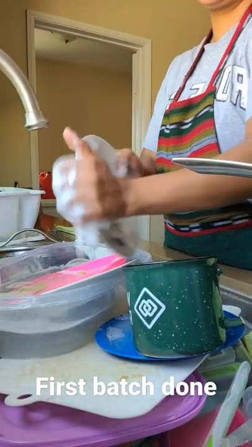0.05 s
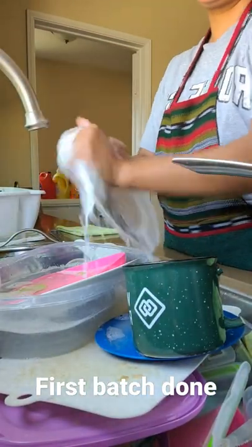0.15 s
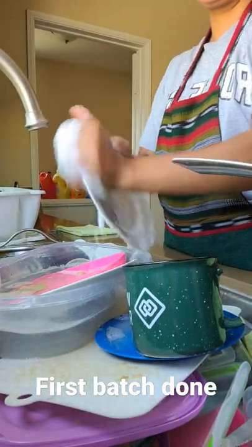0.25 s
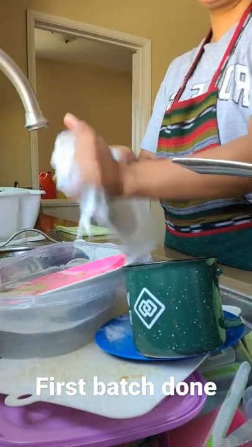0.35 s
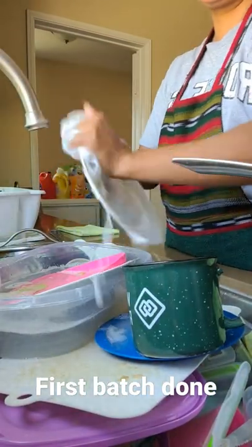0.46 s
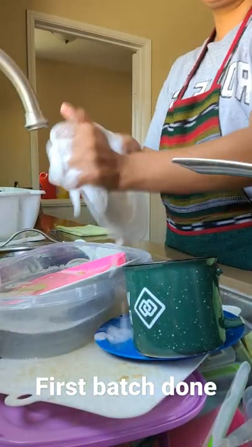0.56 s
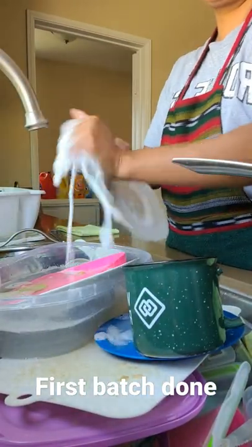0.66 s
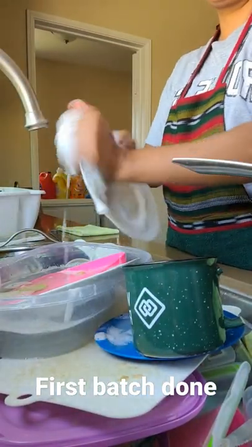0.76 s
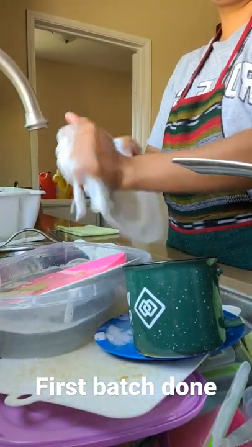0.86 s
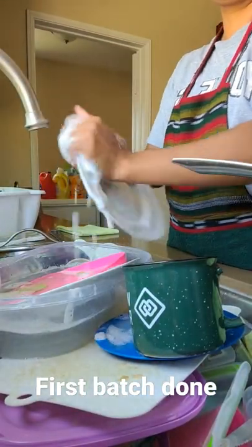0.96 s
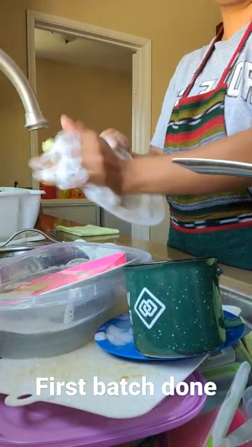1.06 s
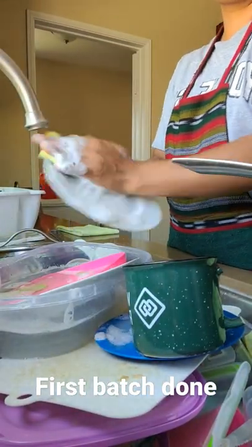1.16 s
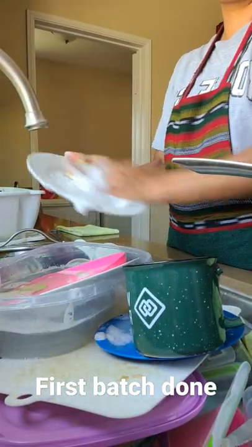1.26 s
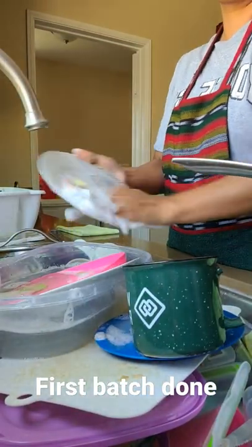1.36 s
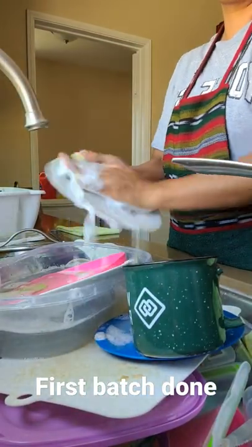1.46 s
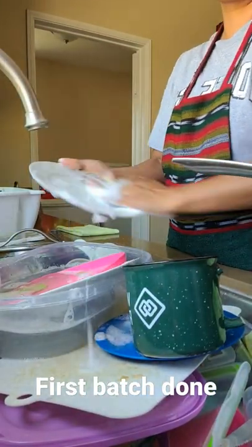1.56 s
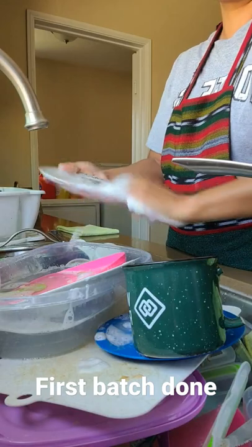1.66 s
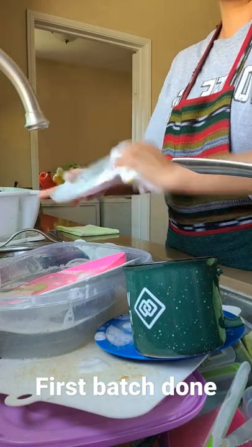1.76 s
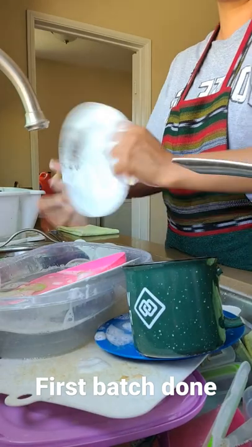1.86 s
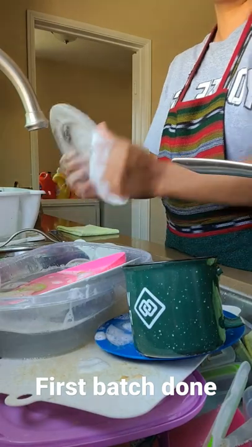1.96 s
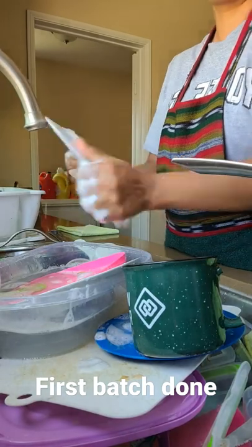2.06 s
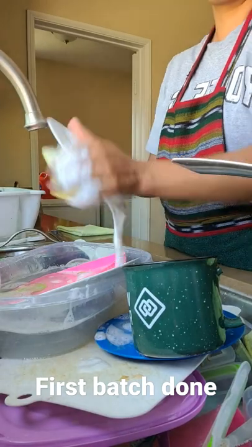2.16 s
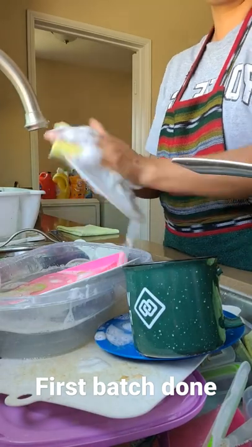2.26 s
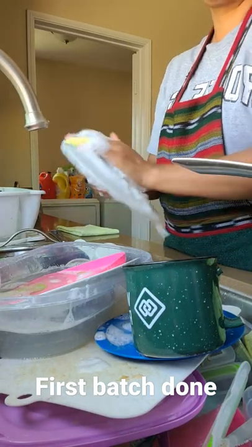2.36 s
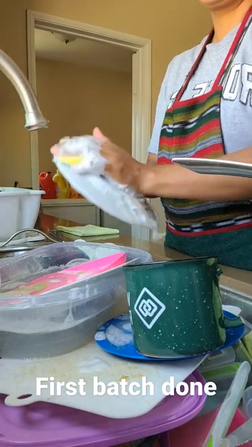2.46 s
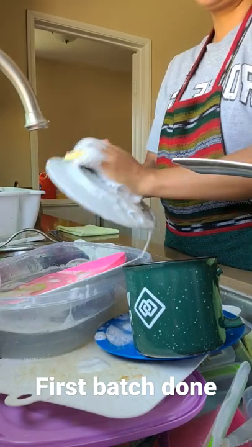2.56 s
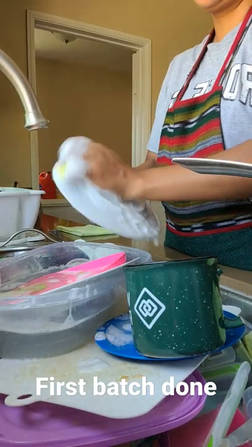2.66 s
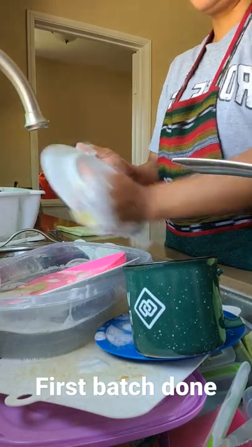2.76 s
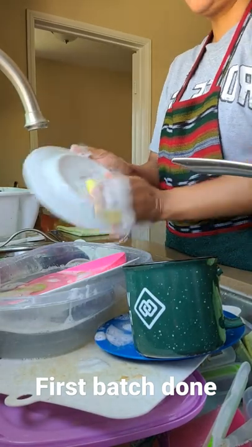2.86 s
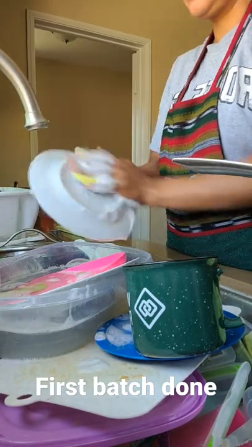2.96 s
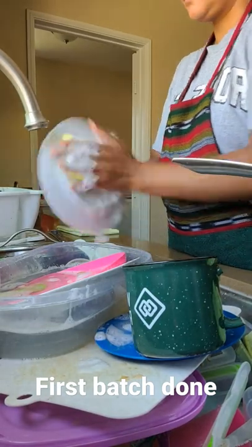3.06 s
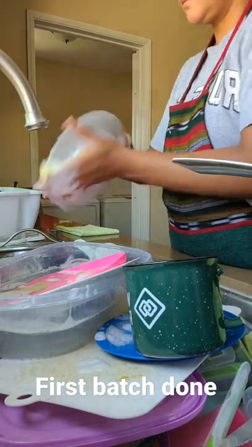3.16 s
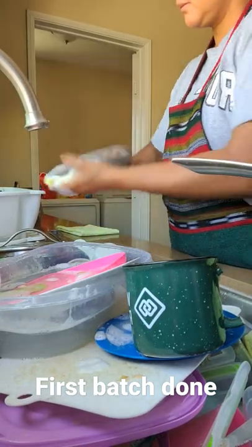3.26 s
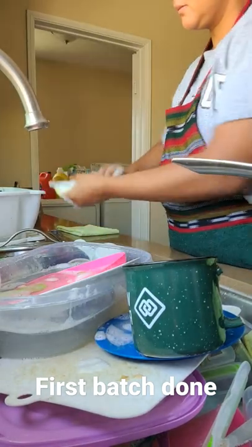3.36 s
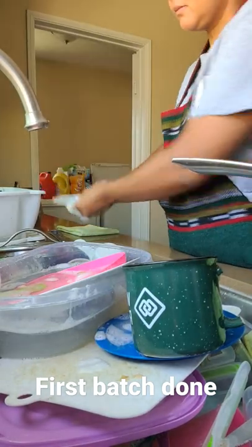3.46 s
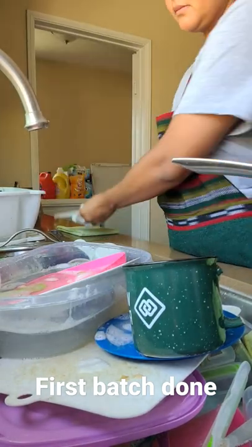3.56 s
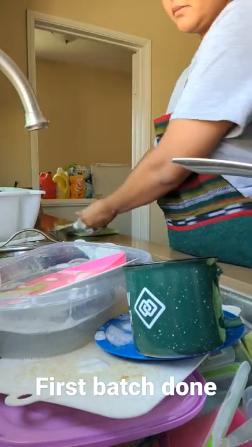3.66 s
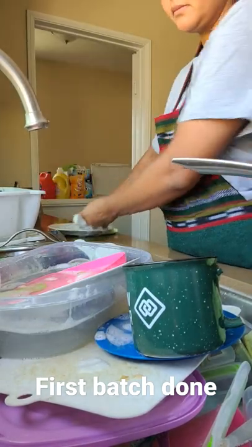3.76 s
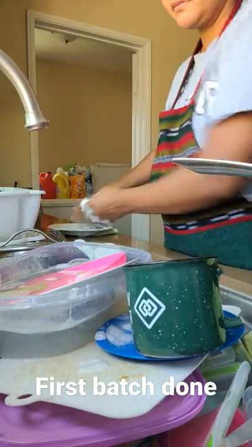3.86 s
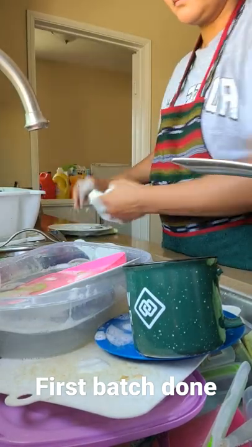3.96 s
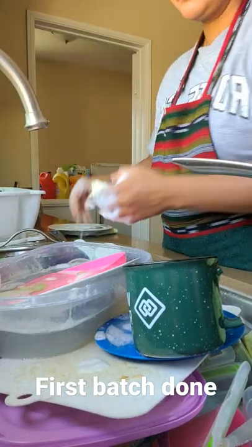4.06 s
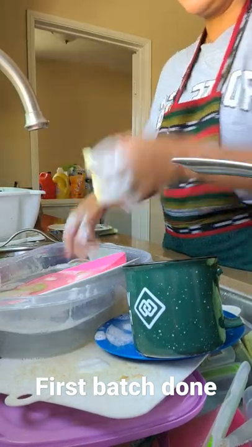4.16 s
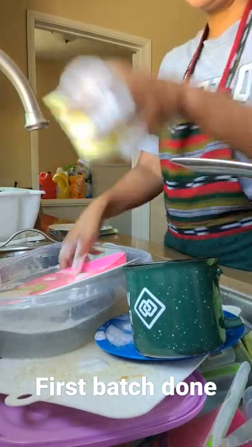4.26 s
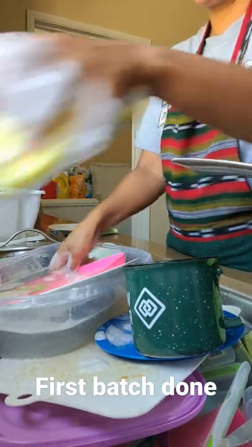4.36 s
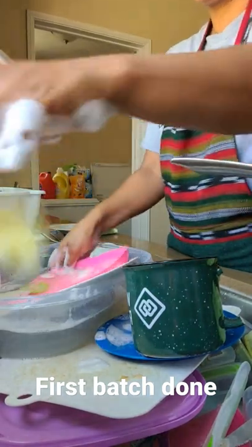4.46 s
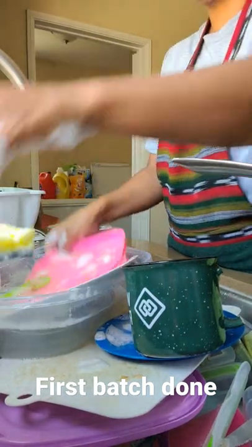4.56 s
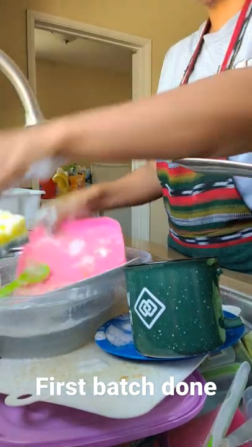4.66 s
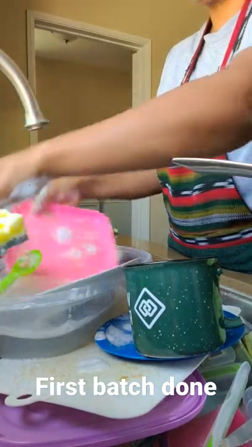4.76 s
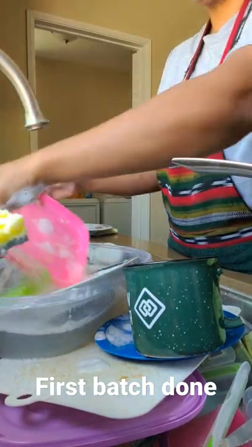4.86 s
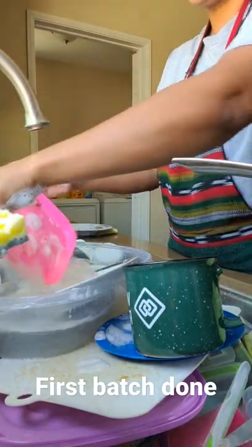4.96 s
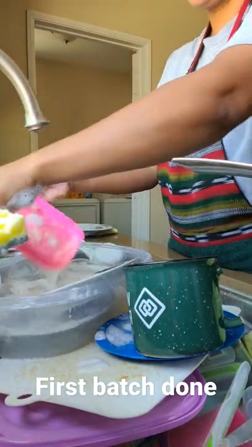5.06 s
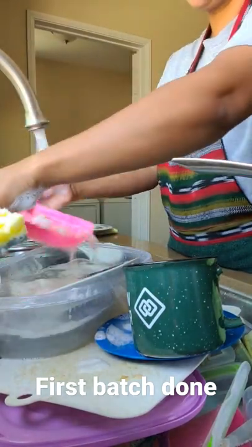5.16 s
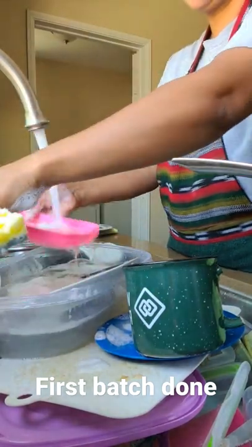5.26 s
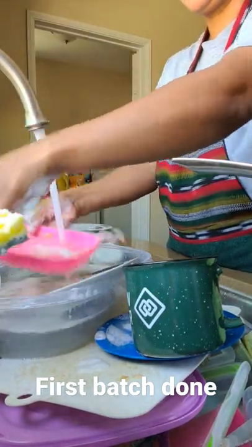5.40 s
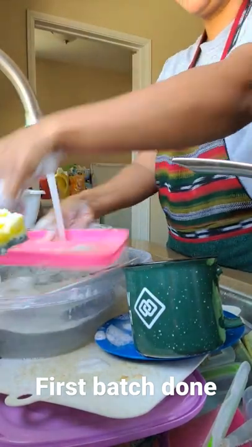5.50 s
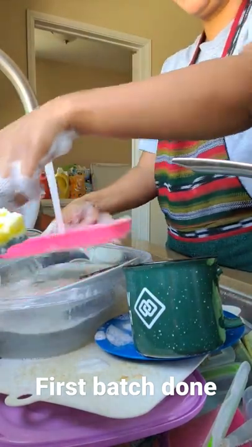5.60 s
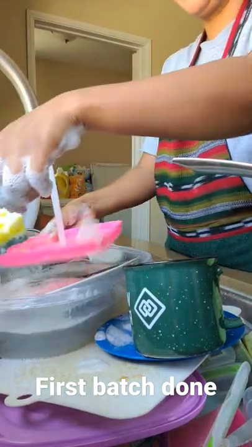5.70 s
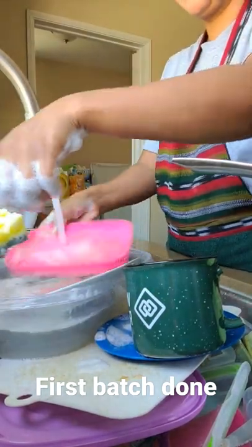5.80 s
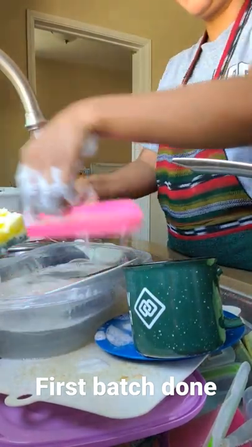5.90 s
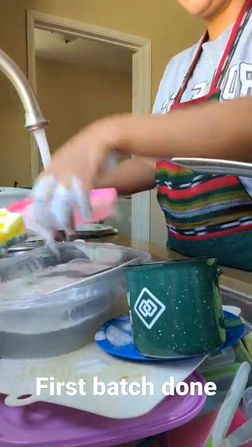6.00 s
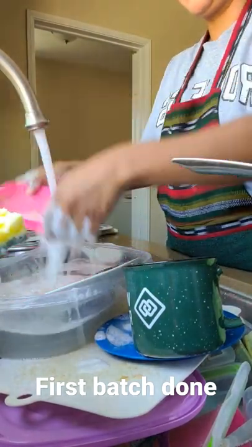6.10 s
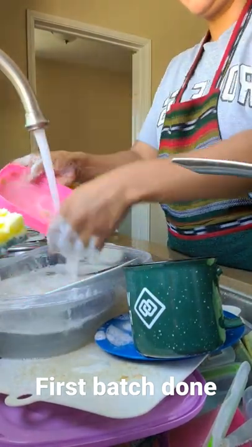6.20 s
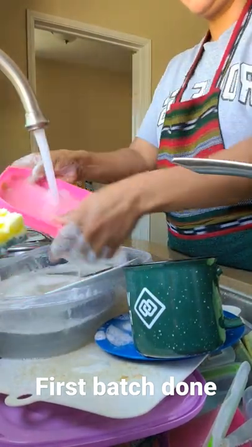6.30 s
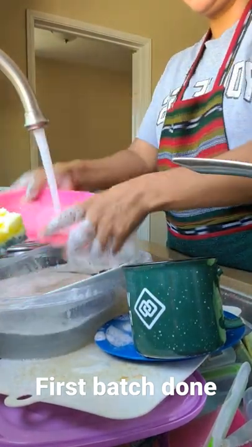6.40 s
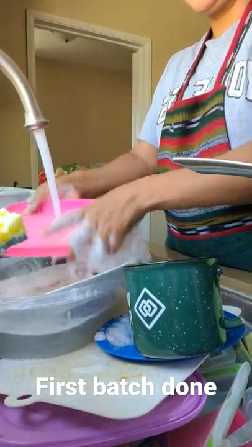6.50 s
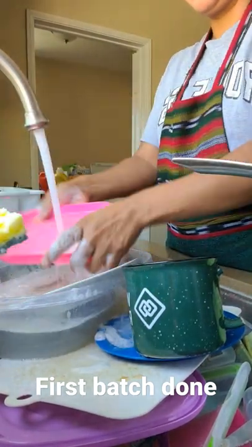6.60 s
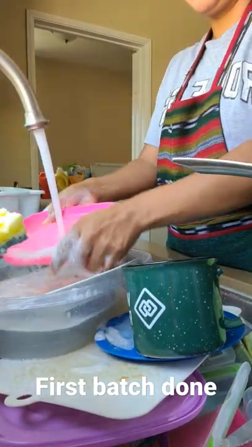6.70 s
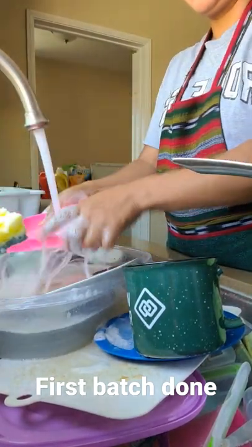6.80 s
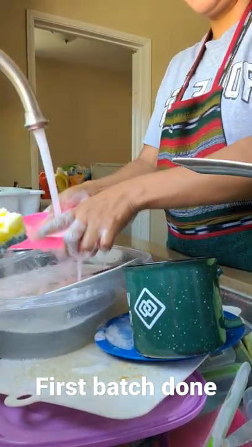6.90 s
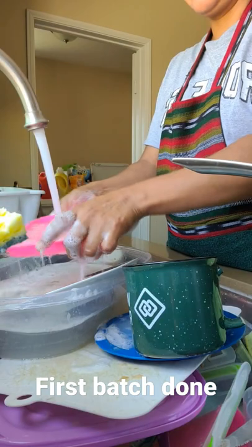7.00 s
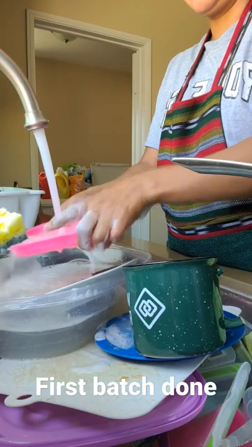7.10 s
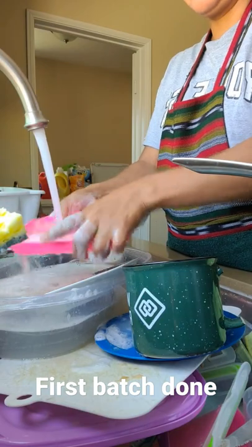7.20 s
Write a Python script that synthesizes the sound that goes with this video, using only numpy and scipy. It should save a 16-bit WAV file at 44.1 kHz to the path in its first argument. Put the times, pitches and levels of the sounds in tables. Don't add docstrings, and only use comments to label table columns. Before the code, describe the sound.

Soapy dishwashing at a kitchen sink: sponge strokes, a wet squeak, clattering dishes, hollow plastic gulps, then a tap hissing onto plastic.

```python
import sys
import numpy as np
from scipy import signal
from scipy.fft import rfft, irfft, next_fast_len
from scipy.io import wavfile
from scipy.ndimage import uniform_filter1d

SR = 44100
rng = np.random.default_rng(int(sys.argv[2]) if len(sys.argv) > 2 else 0)


def undo_db(level):
    steps = np.asarray(level, float) / 20
    return 10 ** steps


def master_out(mix):
    frames = np.transpose(np.atleast_2d(mix))
    ceiling = np.clip(frames, -1, 1)
    pcm = np.round(ceiling * 32767).astype(np.int16)
    wavfile.write(sys.argv[1], SR, pcm)


N = 319284

# frequency in Hz, level in dB per Hz.
RUB_COLOUR = [(380, -30), (650, -6), (813, -12), (1010, 0), (1170, 0), (1400, 5.5), (1520, -1), (2040, 6),
              (2510, -0.5), (2860, 0), (3550, -2.5), (3780, -2), (4400, -19), (5720, -37), (9680, -120)]
# frequency in Hz, level in dB per Hz.
FIZZ_COLOUR = [(2350, -20), (4000, -3), (4390, -5.5), (5830, -1.5), (8650, -12), (9940, -4.5),
               (11200, -10.5), (12200, -10), (13600, -24), (15100, -9.5), (16000, -30)]
RIGHT_LAG_S = 0.0005936
LAG_FROM_HZ = 496


def rms_one(x):
    return x / np.sqrt(np.mean(x ** 2) + 1e-20)


def swell(peak_s, rise_s, fall_s):
    t = np.arange(N) / SR - peak_s
    return np.exp(-(t / np.where(t < 0, rise_s, fall_s)) ** 2)


def ramp(s, length):
    return np.clip((np.arange(N) / SR - s) / length, 0, 1)


def drift(rate):
    knots_per_s = 60
    knots = rng.standard_normal(int(N / SR * knots_per_s) + 2)
    memory = np.exp(-2 * np.pi * rate / knots_per_s)
    slow = rms_one(signal.lfilter([1], [1, -memory], knots))
    return np.interp(np.arange(N) / SR * knots_per_s, np.arange(len(slow)), slow)


def add(out, s, sound):
    i = round(s * SR)
    out[..., i:i + sound.shape[-1]] += sound[..., :N - i]


def at_hz(points, hz):
    points = np.array(points)
    return np.interp(np.log(hz + 1), np.log(points[:, 0]), points[:, 1])


def colour(x, spectrum):
    hz = np.fft.rfftfreq(x.shape[-1], 1 / SR)
    inside = (hz > spectrum[0][0]) & (hz < spectrum[-1][0])
    return irfft(rfft(x) * undo_db(at_hz(spectrum, hz)) * inside, x.shape[-1])


def resonance(x, hz, width_hz):
    r = np.exp(-np.pi * width_hz / SR)
    return signal.lfilter([(1 - r * r) / 2, 0, (r * r - 1) / 2],
                          [1, -2 * r * np.cos(2 * np.pi * hz / SR), r * r], x)


def ports(mid, side):
    # frequency in Hz, likeness from 0 to 1.
    likeness = [(60, 1), (150, 1), (380, 0.99), (950, 0.11), (2380, 0.11), (5980, 0.095), (15000, 0.059)]
    # frequency in Hz, left over right in dB.
    left_lead = [(40, -4.5), (130, -6), (300, -5.5), (700, -5.5), (2000, -4), (4000, -7), (7000, 0),
                 (10500, -10.5), (13000, 3.5), (15500, -3)]
    hz = np.fft.rfftfreq(len(mid), 1 / SR)
    alike = np.clip(at_hz(likeness, hz), -1, 1)
    lead = undo_db(at_hz(left_lead, hz) / 2)
    common = np.sqrt(1 + alike) * rfft(mid)
    apart = np.sqrt(1 - alike) * rfft(side)
    lag = np.exp(-2j * np.pi * hz * RIGHT_LAG_S / (1 + (LAG_FROM_HZ / (hz + 1)) ** 4))
    return irfft(np.array([(common + apart) * lead, (common - apart) / lead * lag]), len(mid))


def grainy(spectrum, per_s, spread_db, grain_db, flicker_db):
    size = next_fast_len(N)
    sizes = undo_db(spread_db * np.minimum(rng.exponential(1, (2, size)), 4))
    sizes = sizes * rng.choice([-1, 1], (2, size))
    drops = rms_one(sizes * (rng.random((2, size)) < per_s / SR))
    noise = rng.standard_normal((2, size)) + undo_db(grain_db) * drops
    both = ports(*colour(noise, spectrum))[:, :N]
    return undo_db(flicker_db * drift(22)) * both / np.std(both.mean(axis=0))


def kitchen():
    # frequency in Hz, time to fall 60 dB in seconds.
    echo_times = [(100, 0.33), (400, 0.16), (2000, 0.25), (8000, 0.23), (15000, 0.27)]
    t = np.arange(SR // 2) / SR
    white = ports(*rng.standard_normal((2, len(t))))
    tail = 0
    for low in 40 * 2. ** np.arange(9):
        octave = signal.butter(2, [low, 2 * low], "band", fs=SR, output="sos")
        band = signal.sosfilt(octave, white)
        tail = tail + band * undo_db(-60 * t / at_hz(echo_times, np.sqrt(2) * low))
    tail = tail * np.minimum(t / 0.0033, 1)
    return tail / np.sqrt(np.sum(tail ** 2) / 2)


def recorder_gain_db():
    # time in seconds, gain in dB.
    gain_curve = [(0.0, 3.5), (0.26, 3), (0.91, -1), (1.95, 4.5), (2.2, -1), (3.1, -2.5), (3.7, 1.5),
                  (3.95, -0.5), (4.56, 0.5), (5.22, 5), (7.24, 2)]
    s, db = np.transpose(gain_curve)
    return np.interp(np.arange(N) / SR, s, db)


def fridge():
    # frequency in Hz, level in dB per Hz.
    rumble_colour = [(12, -37), (20, 3), (65, 0), (91, -0.5), (95, -3), (105, -37), (140, -67), (230, -120)]
    # frequency in Hz, level in dB per Hz.
    drone_colour = [(79, -44), (135, -5), (151, -12), (187, -7), (209, -15), (318, -10.5), (361, -0.5),
                    (383, -7), (472, -11.5), (512, -18.5), (560, -13.5), (635, -20.5), (800, -23),
                    (1040, -22), (1760, -120)]
    # frequency in Hz, level in dB.
    hum_tones = [(30.5, -34), (60, -47), (120, -3), (240, -43), (360, -12), (600, -23)]
    gain_db = recorder_gain_db()
    t = np.arange(N) / SR
    hum = 0
    for hz, db in hum_tones:
        hum = hum + undo_db(db + 0.71 * drift(13)) * np.sin(2 * np.pi * hz * t + 0.5 * drift(1))
    hum = undo_db(-41 + gain_db) * hum * undo_db(np.array([[1.2], [-1.2]]))
    rumble = undo_db(-50.5 + 0.77 * gain_db) * grainy(rumble_colour, 300, 1.47, -34, 0.48)
    basin_boom_db = 4 * ramp(4.34, 0.99)
    drone = undo_db(-47 + gain_db + basin_boom_db) * grainy(drone_colour, 260, 5.4, -1.5, 0.4)
    return hum + rumble + drone


def scrubbing():
    # time of the peak in seconds, level in dB, length in seconds, fizz against rub in dB.
    sponge_strokes = [(0.027, -53, 0.029, -31), (0.243, -58, 0.13, -4.5), (0.472, -66, 0.032, -3),
                      (0.743, -69, 0.03, 3.5), (0.97, -60.5, 0.022, 0), (1.067, -58, 0.081, 3),
                      (1.43, -66, 0.079, 1), (1.693, -60.5, 0.15, -2), (1.855, -48, 0.036, -1.5),
                      (2.227, -54, 0.053, -2), (2.648, -61, 0.049, -2), (2.823, -54.5, 0.051, -0.5),
                      (2.947, -55.5, 0.044, -11), (3.045, -54.5, 0.072, 0), (3.318, -56.5, 0.028, 3),
                      (3.644, -46, 0.0037, -19), (3.814, -63, 0.037, -1), (4.132, -71, 0.067, -1),
                      (4.4, -59, 0.052, -4), (4.668, -62, 0.034, -37), (4.856, -54.5, 0.023, -10),
                      (4.985, -49, 0.044, -1), (5.13, -49.5, 0.033, -3)]
    gain_db = recorder_gain_db()
    rub, fizz = undo_db(-60 + gain_db), undo_db(-65.5 + gain_db)
    for s, db, length, fizz_db in sponge_strokes:
        stroke = undo_db(db) * swell(s, length, 1.94 * length)
        rub = rub + stroke
        fizz = fizz + undo_db(fizz_db) * stroke
    return rub * grainy(RUB_COLOUR, 400, 4.0, -6, .7) + fizz * grainy(FIZZ_COLOUR, 900, 4.0, -6, .7)


def rough_strand(hz):
    tremble = rms_one(signal.lfilter([1], [1, -.992], rng.standard_normal(N)))
    return (.9 + .4 * tremble) * undo_db(2.5 * drift(24)) * np.sin(2 * np.pi * np.cumsum(hz) / SR)


def squeak():
    press = swell(.175, .06, .11)
    lower_hz = 1160 - 110 * (1 - press) + 25 * drift(24)
    upper_hz = 1610 + 25 * drift(24)
    strands = rough_strand(lower_hz) + press * rough_strand(upper_hz)
    return undo_db(-50) * np.sqrt(press) * strands * undo_db(np.array([[3], [-3]]))


def tap():
    # frequency in Hz, level in dB per Hz.
    spray_colour = [(2350, -70), (4000, -6.5), (4120, -25), (4850, -10.5), (5620, -6), (8970, -9),
                    (9620, -5), (10600, -3), (13400, -10.5), (14900, -4), (15500, 8.5), (15900, 2),
                    (16200, -39)]
    # frequency in Hz, level in dB per Hz.
    splash_colour = [(380, -55), (650, -6), (693, 0), (745, -14), (902, -15), (1010, -7.5), (1160, -7.5),
                     (1540, -0.5), (1780, -2), (2020, 1), (2590, -3), (3270, 2), (3780, 0), (4130, -11),
                     (4400, 2.5), (5720, -66), (9680, -120)]
    opens_s, opening_s = 5.118, .036
    surge_db = 2 * swell(5.46, 0.34, 0.34)
    tilt_db = 1.3 * ramp(6.4, 0.72)
    flow = ramp(opens_s, opening_s) * undo_db(surge_db + tilt_db)
    spray = undo_db(-29) * grainy(spray_colour, 2700, 12.0, -11.0, 0.44)
    splash = undo_db(-40) * grainy(splash_colour, 1200, 7, -12, 0.7)
    return flow * (spray + ramp(opens_s, 2.2 * opening_s) * splash)


def gulps():
    # start in seconds, peak in dB, frequency in Hz, time to fall 60 dB in seconds.
    hollow_bumps = [(4.104, -23.5, 380, 0.052), (4.458, -21.5, 430, 0.072), (4.462, -29, 804, 0.1),
                    (4.837, -29.5, 304, .05), (4.888, -20, 380, 0.082), (4.901, -23, 483, 0.058),
                    (4.918, -28, 424, 0.08), (4.889, -33, 913, 0.059), (4.995, -15.5, 303, 0.029),
                    (5.4, -37, 380, 0.076), (6.549, -24.5, 359, 0.13), (6.906, -21, 658, 0.044)]
    out = np.zeros((2, N))
    t = np.arange(SR // 5) / SR
    for s, peak_db, hz, t60 in hollow_bumps:
        tone = np.sin(2 * np.pi * hz * t * (1 + 2.0 * t))
        add(out, s, undo_db(peak_db - 6.0) * tone * undo_db(-60 * t / t60) * np.minimum(t / 0.0038, 1))
    return out


def touches():
    # start in seconds, peak in dB, resonance in Hz, its level in dB, bright part in dB.
    short_ticks = [(0.566, -34, 2040, 0, -33), (1.036, -22.5, 840, 12, -2.5), (1.448, -37.5, 2060, 5, -11),
                   (1.513, -32.5, 2000, -15, -2.5), (1.812, -39.5, 2000, -10, 10.5),
                   (1.937, -38, 2430, 7, 7.5), (2.569, -32, 2800, 0.5, 3.5), (4.44, -39, 3400, -9, 7),
                   (4.457, -34, 3260, 12, 6.5), (4.565, -42.5, 2090, 8, -20),
                   (4.949, -42.5, 2800, 14, 16.5)]
    # start in seconds, peak in dB, resonance in Hz, its level in dB,
    # length in seconds.
    drag_scuffs = [(0.011, -39, 1680, -1, 0.0049), (0.035, -39.5, 1520, 5.5, 0.0056),
                   (0.093, -39.5, 1550, 8.5, 0.0054), (0.948, -38.5, 3200, 3, 0.0073),
                   (1.035, -30, 880, 4, 0.012), (1.058, -48, 2400, -9, 0.011),
                   (2.278, -37, 2070, -6, 0.0057), (2.486, -42, 2020, -7, 0.016),
                   (3.056, -33.5, 2900, -3, 0.0093), (4.092, -43.5, 1000, 0.5, 0.0082),
                   (4.434, -31.5, 2710, 2, 0.0076), (4.4517, -25, 2020, -14, 0.0048),
                   (4.469, -24, 2500, -1, 0.0031), (4.644, -29, 1250, -4, 0.01),
                   (4.656, -34.5, 2140, 3, 0.0091), (4.671, -37.5, 1230, 3, .009),
                   (4.683, -35, 1900, 2, 0.007), (4.695, -34, 2100, 0, 0.0072),
                   (4.722, -40, 1360, 4, 0.014), (4.827, -36.5, 2800, -3, 0.0045),
                   (4.994, -31.5, 1380, 3.5, 0.0054), (5.068, -43, 2050, 2, .008),
                   (5.023, -34.5, 1960, -3, 0.011), (4.962, -49, 2050, 3, 0.0092),
                   (5.105, -43, 1980, 2, 0.013), (5.471, -36, 3510, 12.5, 0.0097),
                   (6.141, -30, 2520, -1, 0.013), (6.553, -30, 3980, -19, 0.022)]
    # frequency in Hz, width in Hz, level in dB.
    tub_modes = [(694, 99, 21.5), (1210, 41, 1), (1900, 55, 15), (2020, 46, 7), (2180, 56, -1),
                 (2800, 24, 13)]
    tub_from_s, tub_until_s, tick_s = 4.3, 5.2, 0.0023
    glaze_bright_db, plastic_bright_db = -7, -16.5
    contacts = [(*tick, tick_s) for tick in short_ticks]
    for s, peak_db, hz, tone_db, length in drag_scuffs:
        bright_db = plastic_bright_db if tub_from_s < s < tub_until_s else glaze_bright_db
        contacts.append((s, peak_db, hz, tone_db, bright_db, length))
    out, size = np.zeros((2, N)), SR // 5
    t = np.arange(size) / SR
    for s, peak_db, hz, tone_db, bright_db, length in contacts:
        left, other = rng.standard_normal((2, size))
        grit = np.array([left, np.roll(.5 * left + 1.37 * other, round(RIGHT_LAG_S * SR))])
        puff = t / length * np.exp(1 - t / length)
        dull, bright = rms_one(colour(grit, RUB_COLOUR)), rms_one(colour(grit, FIZZ_COLOUR))
        tone = rms_one(resonance(resonance(grit, hz, width_hz=340), hz, width_hz=340))
        if tub_from_s < s < tub_until_s:
            tub = sum(undo_db(db) * resonance(dull, tub_hz, width) for tub_hz, width, db in tub_modes)
            dull = dull / 1.6 + rms_one(tub)
        add(out, s, undo_db(peak_db - 10.5) * puff * (dull + undo_db(tone_db) * tone + undo_db(bright_db) * bright))
    return (out + gulps()) * undo_db(np.array([[-2.], [2.5]]))


def ring(strikes, hz, t60):
    t = np.arange(len(strikes)) / SR
    bloom = np.exp(-1 / (0.0005 * SR))
    decay = undo_db(-120 / (t60 * SR))
    energy = signal.lfilter([1 - bloom], np.convolve([1, -bloom], [1, -decay]), strikes ** 2 + 1e-18)
    lag = RIGHT_LAG_S / (1 + (LAG_FROM_HZ / hz) ** 4) * rng.uniform(.6, 1.4)
    phase = rng.uniform(0, 2 * np.pi) - 2 * np.pi * hz * np.array([[0], [lag]])
    pan = undo_db(np.array([[-4.5], [4.5]]) / 2)
    return np.sqrt(energy) * np.sin(2 * np.pi * hz * t + phase) * pan


def dish_body(after, bounce_db, modes, size):
    # frequency in Hz, level in dB, time to fall 60 dB in seconds.
    sink_modes = [(163.2, -10.5, 0.13), (272.6, -9.5, 0.079)]
    partners = [(1.0, 1.0, 1.0), (1.007, .6, .75), (.988, .5, .55), (1.03, .4, .4), (.94, .35, .4)]
    body = np.zeros((2, size))
    for hz, db, t60 in [*modes, *sink_modes]:
        for pitch, share, life in partners:
            strikes = np.zeros(size)
            uneven_db = 3.5 * rng.standard_normal(len(after))
            strikes[(after * SR).astype(int)] = undo_db(bounce_db + uneven_db)
            body += undo_db(db) * share * ring(strikes, hz * pitch, life * t60)
    return body


def dish_crack(after, bounce_db, spectrum, rattle, size):
    t = np.arange(size) / SR
    since = t - after[:, None]
    snaps = np.sum(undo_db(bounce_db)[:, None] * (since > 0) * np.exp(-np.abs(since) / 0.0032), axis=0)
    shape = np.minimum(t / 0.0019, 1) ** 2 * (0.55 * np.exp(-t / rattle) + 0.33 * snaps)
    chatter = undo_db(7 * np.interp(t / 0.005, np.arange(500), rng.standard_normal(500)))
    noise = rms_one(ports(*colour(rng.standard_normal((2, size)), spectrum)))
    return noise * shape * chatter


def blows():
    # start in seconds, peak in dB, crack in dB, left over right in dB, rattle in seconds.
    hard_blows = [
        (0.289, -10, 3, -1, 0.016),
        (1.998, -9, -3, -1, 0.045),
        (2.106, -21, -4.5, 0, 0.019),
        (3.645, -8, -4, 0.5, 0.038),
        (5.747, -11.5, 0.5, 1, 0.0066),
    ]
    # seconds after the blow, level in dB.
    rocking = [
        [(.0005, -2), (.0035, -7), (.016, -6.5), (.043, -13.5), (.053, -13)],
        [(.001, 0.5), (.014, -1), (.034, -5), (.05, -12.5), (.069, -10.5)],
        [(.001, 3), (.008, -1)],
        [(.002, -1), (.009, 1), (.018, -1), (.04, -16), (.058, -12.5)],
        [(.0005, -0.5), (.009, 2.5)],
    ]
    # frequency in Hz, level in dB per Hz.
    crack_colours = [
        [(120, -36), (280, -18), (580, -3), (856, -14), (1430, -4), (1680, -20), (2110, -1.5), (2480, -23),
         (2750, -18), (11300, -30), (16000, -57)],
        [(35, -30), (60, -3), (250, -10.5), (470, -2), (1010, -18.5), (1470, -10), (3850, -12), (4860, -17.5),
         (5210, -9.5), (8710, -20), (10000, -13), (14600, -36), (16000, -54)],
        [(120, -45), (200, -9), (418, 7), (801, -25), (1340, -5), (12000, -43), (15600, -62), (22000, -120)],
        [(59, -54), (110, -22), (270, -1), (480, 1.5), (854, -7.5), (1910, -2), (2080, -10), (2520, 5),
         (2690, -4), (4670, -12), (5190, -12), (10000, -14), (14700, -33), (16000, -58)],
        [(150, -41), (250, -45), (571, 3.5), (1580, -9.5), (1930, -5), (2440, -11), (2780, -16), (8000, -21),
         (10400, -50), (17600, -120)],
    ]
    # frequency in Hz, level in dB, time to fall 60 dB in seconds.
    cup_modes = [(419, -8, 0.25), (570, -2, 0.17), (640, -23, 0.081), (939, 0.5, 0.11), (1320, -7, .12),
                 (1480, -11, .14), (1950, -4, 0.31), (2170, -12, .17), (2159, -3.5, 0.15),
                 (2410, -24, 0.32), (2765, 2.5, 0.12), (3370, -12, .11), (3860, -12, .16),
                 (4565, -34, 0.23)]
    # frequency in Hz, level in dB, time to fall 60 dB in seconds.
    stack_modes = [(435, -4.5, .16), (653, -1, 0.12), (1474, -6.5, 0.14), (1542, -4.5, 0.053),
                   (1690, 0.5, 0.048), (1870, -1.5, 0.051), (2040, -2.5, .05), (2164, -17.5, 0.2),
                   (2360, -11.5, .3), (2520, -15, 0.27), (3250, -28, .25), (3730, -17, 0.33),
                   (3930, -11, 0.19), (880, -12.5, 0.089)]
    # frequency in Hz, level in dB, time to fall 60 dB in seconds.
    settling_modes = [(356, -6, 0.14), (430, -11, 0.22), (660, -3, 0.094), (1310, -5, 0.089),
                      (1360, -3, 0.08), (1840, -13, 0.17), (2385, -10, 0.17)]
    # frequency in Hz, level in dB, time to fall 60 dB in seconds.
    plate_modes = [(960, -9.5, 0.098), (351, -3, 0.047), (507, 1, 0.053), (1230, 5.5, 0.038),
                   (1384, -8.5, 0.22), (1960, -7, 0.2), (2250, -14.5, 0.19), (2405, -9, 0.22),
                   (2477, -4, 0.33), (3250, -13, 0.19), (3850, -12, 0.28), (4080, -13, .2),
                   (5240, -17, 0.27), (6320, -17, 0.26)]
    # frequency in Hz, level in dB, time to fall 60 dB in seconds.
    lid_modes = [(521, -8.5, 0.14), (593, -0.5, .08), (940, -17, 0.14), (1285, -7, 0.1),
                 (1949, -7.5, 0.059), (2740, -8.5, 0.098), (3670, -11, 0.027)]
    dishes = (cup_modes, stack_modes, settling_modes, plate_modes, lid_modes)
    rings, cracks, size = np.zeros((2, N)), np.zeros((2, N)), SR // 3
    for blow, bounces, modes, spectrum in zip(hard_blows, rocking, dishes, crack_colours):
        s, peak_db, crack_db, pan_db, rattle = blow
        sides = undo_db(peak_db + np.array([[pan_db], [-pan_db]]) / 2)
        after, bounce_db = np.transpose(bounces)
        add(rings, s, undo_db(-9) * sides * dish_body(after, bounce_db, modes, size))
        add(cracks, s, undo_db(crack_db) * sides * dish_crack(after, bounce_db, spectrum, rattle, size))
    return rings, cracks


def scene():
    rings, cracks = blows()
    light = touches()
    sent = undo_db(-4.5) * rings + undo_db(-1) * cracks + undo_db(-10) * light
    struck = rings + cracks + light + signal.fftconvolve(sent, kitchen(), axes=1)[:, :N]
    no_bass = signal.butter(2, 130, "high", fs=SR, output="sos")
    return signal.sosfilt(no_bass, struck) + squeak() + fridge() + scrubbing() + tap()


def top_cut(x):
    return signal.sosfilt(signal.butter(12, 16590, fs=SR, output="sos"), x)


def record(dry):
    level = np.sqrt(uniform_filter1d(np.mean(dry ** 2, axis=0), size=SR // 200) + 1e-12)
    limited = dry * np.minimum(undo_db(-7.5) / level, 1) ** 0.18
    rounded = 1.2 * np.tanh(limited / 1.2)
    top = signal.cheby2(10, 60, 16300, fs=SR, output="sos")
    return top_cut(signal.sosfilt(top, rounded))


dry = scene()
out = record(dry)
master_out(out)
```